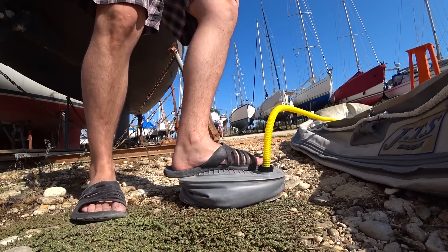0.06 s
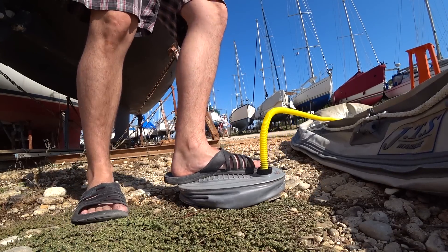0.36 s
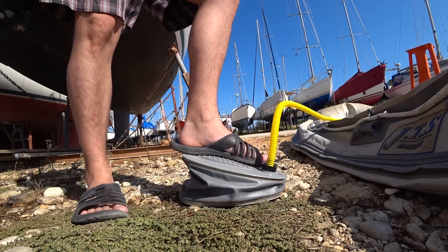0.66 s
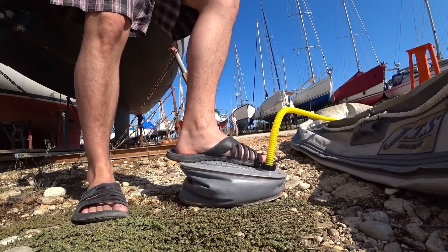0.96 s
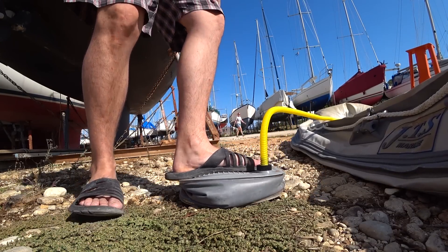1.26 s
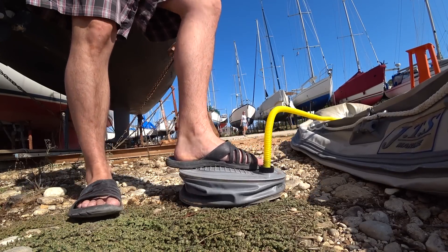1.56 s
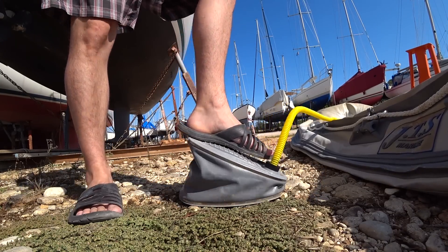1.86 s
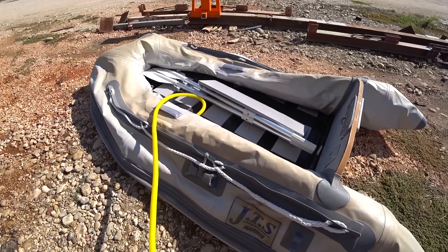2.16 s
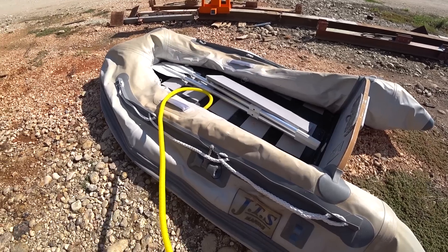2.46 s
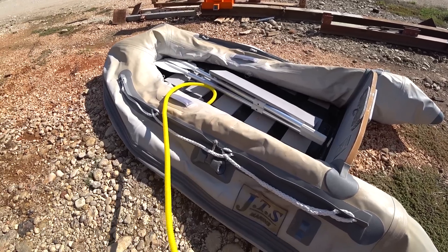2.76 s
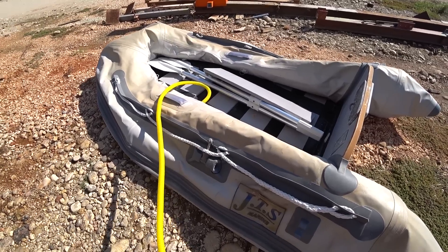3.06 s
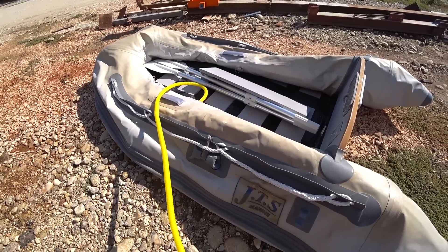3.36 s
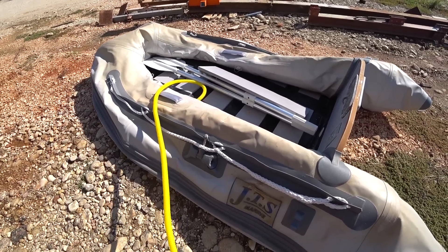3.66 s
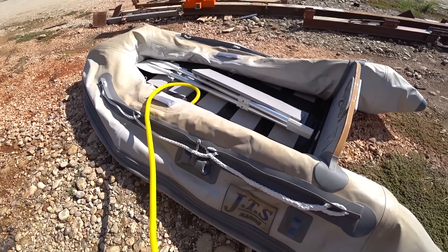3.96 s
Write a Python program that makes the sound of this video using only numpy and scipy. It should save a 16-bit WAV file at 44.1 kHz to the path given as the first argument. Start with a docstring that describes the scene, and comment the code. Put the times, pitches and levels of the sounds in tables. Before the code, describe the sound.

Air hisses in repeated pushes from a fabric foot bellows inflating a dinghy outdoors. A high valve whistle rides the strokes, alternating with faintly hooting intakes, soft thuds and snaps. Halfway, the microphone jumps from pump to boat.

```python
"""A hiss of air with a thin whistle on top: a fabric foot bellows pumps up a rubber dinghy on gravel.
Five pushes rush through the hose, and four of them make a valve whistle. Between them the bellows
gulps air through its inlet with a faint hoot; its coated cloth pops, crumples, thuds and rubs.
It is heard beside the pump at first, then abruptly from above the boat."""
import sys
import numpy as np
from scipy import signal
from scipy.fft import rfft, irfft, next_fast_len
from scipy.io import wavfile
from scipy.ndimage import uniform_filter1d, map_coordinates

SR = 44100
rng = np.random.default_rng(int(sys.argv[2]) if len(sys.argv) > 2 else 0)


def generate_wav(signal):
    """Clip the signal to [-1, 1] and save it as 16-bit WAV at the path in sys.argv[1]."""
    frames = np.transpose(np.atleast_2d(signal))
    scaled = np.clip(frames, -1, 1) * 32767
    pcm = np.round(scaled).astype(np.int16)
    wavfile.write(sys.argv[1], SR, pcm)


N = 176400


# Foot pushes: start_s, full_flow_s, ease_s, end_s, level_db
PUSHES_PUMP = [(-.1, .04, 0.21, 0.64, -31), (.915, 1.09, 1.285, 1.55, -30.5), (1.925, 2.1, 2.2, 2.4, -32)]
PUSHES_BOAT = [(1.85, 1.96, 2.185, 2.384, -29), (2.71, 2.88, 3.05, 3.307, -29),
               (3.63, 3.79, 3.95, 4.1, -29.5)]
# Hiss spectrum: freq_hz, gain_db
HISS_PUMP = [(100, -31.5), (400, -12), (760, -1), (4000, -1), (8500, -11), (11000, -12)]
HISS_BOAT = [(100, -36), (350, -19.5), (700, -4.5), (1400, -7), (3600, 0.5), (8000, -3.5), (11000, -11)]
# Hose resonance: centre_hz, width_hz, gain_db
HOSE_MODES_PUMP = [(1890, 47, 3.5)]
HOSE_MODES_BOAT = [(1870, 300, -0.76)]

def hose_hiss(pushes, spectrum, modes, rise_db=23.5, sag_db_per_s=27, release_s=0.054, flutter_db=0.86):
    """Air forced through the hose swells, holds and sags; more flow is brighter."""
    body, treble = turbulence(spectrum, modes)
    out, t = np.zeros(N), clock()
    for start, full, ease, end, db in pushes:
        rise = np.clip((full - t) / (full - start), 0, 2)
        flow_db = -rise_db * rise ** 2 - sag_db_per_s * np.maximum(t - ease, 0)
        valve = (t > start) * np.clip((end - t) / release_s, 0, 1)
        out += valve * amp(db + flow_db) * (body + treble * amp(0.58 * flow_db))
    return out * amp(flutter_db * wobble(60))


# Refills: start_s, full_flow_s, ease_s, end_s, level_db
GULPS_PUMP = [(.55, .735, 0.767, 0.864, -24.5), (1.535, 1.67, 1.749, 1.8855, -25.5)]
GULPS_BOAT = [(2.34, 2.51, 2.541, 2.698, -22), (3.283, 3.318, 3.416, 3.588, -21)]
# Inlet spectrum: freq_hz, gain_db
INLET_PUMP = [(100, -35), (270, -9.5), (680, -8), (860, 3), (2000, -1.5), (4100, -3), (6800, -6),
              (8800, -22), (10800, -18)]
INLET_BOAT = [(100, -39), (240, -13), (650, -18.5), (870, -4), (2200, -0.5), (2800, -10.5), (3500, -5),
              (4500, -16), (7000, -14), (9000, -22)]
# Inlet resonance: centre_hz, width_hz, gain_db
INLET_MODES_PUMP = [(4040, 160, -5.5)]
INLET_MODES_BOAT = [(1350, 103, 2.6)]

def inlet_gulps(gulps, spectrum, modes, swell_db=29.5, flutter_db=1):
    """Air drawn past the fluttering inlet flap, one arch per refill."""
    body, treble = turbulence(spectrum, modes)
    out, t = np.zeros(N), clock()
    for start, full, ease, end, db in gulps:
        off_peak = np.maximum((full - t) / (full - start), (t - ease) / (end - ease))
        flow_db = -swell_db * np.clip(off_peak, 0, 2) ** 2
        out += amp(db + flow_db) * (body + treble * amp(0.069 * flow_db))
    return out * amp(flutter_db * wobble(150))


# Valve tone, one track per whistle: time_s, pitch_hz, level_db, octave_level_db
WHISTLES = [
    [(0, 4540, -35, -47), (.07, 5080, -29, -30), (.154, 5306, -26.5, -25), (.238, 4940, -30.5, -35.5),
     (.29, 4590, -37, -48)],
    [(1.015, 4850, -38, -58), (1.055, 4669, -33.5, -44), (1.118, 5250, -27.5, -27),
     (1.18, 5460, -35, -28.5), (1.222, 5160, -27.5, -25.5), (1.255, 4900, -26, -34),
     (1.296, 4800, -28.5, -43)],
    [(2.825, 4750, -37, -42), (2.96, 4970, -40, -50), (3.045, 4970, -29.5, -34), (3.075, 4880, -29, -29),
     (3.104, 4460, -27.5, -31), (3.12, 4330, -38, -43)],
    [(3.727, 4690, -31.5, -63), (3.77, 4910, -35, -47), (3.83, 4960, -44, -56), (3.91, 4780, -30, -44),
     (3.955, 4886, -24.5, -38), (3.98, 4750, -24, -32), (4, 4550, -29, -27.5)],
]

def valve_whistles(trim_db=-1.5, flutter_db=2, rattle_at_s=1.268, rattle_half_s=0.0321):
    """The valve sings an unsteady gliding tone and its octave; the pitch rattles once, briefly."""
    drift = 1 + 0.00305 * wobble(90) + 0.00705 * wobble(1200)
    rattle = np.exp(-((clock() - rattle_at_s) / rattle_half_s) ** 4)
    drift += 0.028 * rattle * wobble(700)
    tone_flutter, octave_flutter = amp(flutter_db * wobble(110)), amp(flutter_db * wobble(110))
    out = np.zeros(N)
    for track in WHISTLES:
        gate, hz, db, octave_db = curves(track, fade_s=.004)
        phase = 2 * np.pi * np.cumsum(hz * drift) / SR
        tone = tone_flutter * amp(db) * np.sin(phase)
        octave = octave_flutter * amp(octave_db) * np.sin(2 * phase)
        out += gate * (tone + octave)
    return np.sqrt(2) * amp(trim_db) * out


# Inlet noise bands, one track per band: time_s, pitch_hz, level_db
HOOTS = [
    [(1.6, 2429, -45), (1.652, 2500, -31), (1.69, 3050, -35)],
    [(2.46, 1661, -37), (2.53, 1858, -27), (2.62, 2024, -35)],
    [(3.31, 3770, -32), (3.36, 3590, -30.5), (3.44, 3094, -38)],
    [(3.31, 2750, -30.5), (3.345, 2610, -27), (3.42, 2300, -39)],
]

def inlet_hoots(width_hz=170):
    """Narrow bands of turbulence glide at the inlet as the bellows opens."""
    out = np.zeros(N)
    for track in HOOTS:
        gate, hz, db = curves(track)
        band = wobble(width_hz) + 1j * wobble(width_hz)
        carrier = np.exp(2j * np.pi * np.cumsum(hz) / SR)
        out += gate * amp(db) * unit(np.real(band * carrier))
    return out


# Snaps: start_s, level_db, cutoff_hz, t60_s
POPS = [(0.9428, -23.5, 6840, 0.0032), (1.412, -24, 2100, 0.028), (2.7384, -32, 3180, 0.027),
        (3.568, -27.5, 1490, 0.021), (3.623, -26.5, 1790, 0.015), (3.6863, -17.5, 1870, 0.044),
        (3.69, -14, 1370, 0.021), (3.691, -13.5, 760, 0.031)]
# Cloth resonances: centre_hz, width_hz, gain_db
CLOTH_MODES = [(367, 117, 4.5), (724, 114, 2), (1150, 170, 2), (1414, 180, 4)]

def cloth_pops(broadband_db=-4, tail_db=-27, tail_t60_s=0.18):
    """Cloth and inlet flap snap taut and ring the cloth's resonances; tight snaps have little bass."""
    out = np.zeros(N)
    for start, db, cutoff_hz, t60 in POPS:
        def skin(f):
            lowpass = 1 / np.sqrt(1 + (f / cutoff_hz) ** 4)
            highpass = f ** 2 / (f ** 2 + (0.3 * cutoff_hz) ** 2)
            return (amp(broadband_db) + ring(CLOTH_MODES, f)) * lowpass * highpass
        envelope = burst(start, t60) + amp(tail_db) * burst(start, tail_t60_s)
        snap = filtered(rng.standard_normal(N), skin) * envelope
        out += amp(db) * snap * np.linalg.norm(envelope) / np.linalg.norm(snap)
    return out


# Slack folds flipping over: start_s, level_db
FOLD_THUDS = [(.82, -29), (1.887, -32.5), (2.515, -28), (2.694, -28.5), (3.481, -25.5)]
# Hollow knocks under the foot: start_s, level_db
FOOT_KNOCKS = [(.9615, -13), (2.7236, -14.5)]

def bellows_thuds(hits, pitch_hz, t60_s, attack_s=0.00083, rough_rad=0.57):
    """A rough damped tone as a fold flips over or the bellows takes the foot's weight."""
    out = np.zeros(N)
    for start, db in hits:
        t = np.maximum(clock() - start, 0)
        envelope = burst(start, t60_s) * (1 - np.exp(-t / attack_s))
        out += amp(db) * envelope * np.sin(2 * np.pi * pitch_hz * t + rough_rad * wobble(300))
    return out


# Crumpling folds: centre_s, half_length_s, level_db, centre_hz
CRUMPLES = [(0.791, .05, -36, 727), (1.749, .12, -39, 602), (2.259, .17, -36.5, 972),
            (2.688, .04, -37, 850), (3.18, .08, -35.5, 900.1)]

def cloth_crumples(creases_per_s=750, t60_cycles=28, size_spread_db=3.5):
    """Swarms of tiny damped creases as the cloth folds."""
    out, t = np.zeros(N), np.arange(SR // 50) / SR
    for centre_s, half_s, db, centre_hz in CRUMPLES:
        count = int(creases_per_s * 2 * half_s)
        when, pitch, size = np.hsplit(rng.standard_normal((400, 3))[:count], 3)
        start_s = centre_s + half_s * np.tanh(when / 2)
        hz = np.clip(centre_hz * np.exp(0.474 * pitch), 150, 9000)
        decay = amp(-60 * t * hz / t60_cycles)
        creases = amp(size_spread_db * size) * np.sqrt(hz) * np.sin(2 * np.pi * hz * t) * decay
        samples = (start_s * SR).astype(int) + np.arange(len(t))
        swarm = np.bincount(samples.ravel(), creases.ravel(), N)[:N]
        out += amp(db) * swarm * np.sqrt(half_s * SR) / np.linalg.norm(swarm)
    return out


# Rub under the sole, creak as the foot lifts: centre_s, length_s, level_db
RUBS = [(1.485, 0.061, -27)]
CREAKS = [(.557, 0.056, -31)]
# Bellows resonances: centre_hz, width_hz, gain_db
RUB_MODES = [(457, 76, 1), (860, 240, 5.5), (1245, 120, 10.5), (3200, 700, -6.5)]
CREAK_MODES = [(494, 54, 5.5), (1144, 70, 6.5), (1497, 47, 5), (3110, 70, 4)]

def cloth_friction(strokes, modes, slips_per_s=2600):
    """Irregular slips of cloth on cloth ring the flattened bellows."""
    slips = (rng.random(N) < slips_per_s / SR) * (1 + .5 * rng.standard_normal(N))
    rasp = unit(filtered(slips, lambda f: ring(modes, f)))
    envelope = sum(amp(db) / (1 + (2 * (clock() - at) / length) ** 8) for at, length, db in strokes)
    return rasp * envelope


# Outdoor air spectrum: freq_hz, gain_db
AIR_SPECTRUM = [(25, -20), (800, 4.5), (3000, -17.5)]

def outdoor_air(level_db=-53.5):
    """Faint steady outdoor noise."""
    return amp(level_db) * unit(filtered(rng.standard_normal(N), lambda f: amp(along(AIR_SPECTRUM, f))))


def ground_scatter(x, level_db=-13.5, t60_s=.07):
    """Short diffuse stereo reflections from ground and hulls."""
    tail = (rng.standard_normal((2, N)) * burst(0, t60_s))[:, :SR // 2]
    tail /= np.linalg.norm(tail[0])
    return amp(level_db) * signal.fftconvolve(x[None], tail, axes=1)[:, :N]


def turbulence(spectrum, modes, ripple_db=2.6, split_hz=3730):
    """Duct noise with main resonances and fine ones that drift as it flexes; returns body, treble."""
    frames = signal.stft(rng.standard_normal(N), nperseg=1024)[2]
    ripple = uniform_filter1d(rng.standard_normal(frames.shape), 3, axis=0)
    ripple = unit(uniform_filter1d(ripple, 16, axis=1))
    noise = signal.istft(frames * amp(ripple_db * ripple), nperseg=1024)[1][:N]
    rush = unit(filtered(noise, lambda f: amp(along(spectrum, f)) * (1 + ring(modes, f))))
    body = filtered(rush, lambda f: 1 / (1 + (f / split_hz) ** 8))
    return body, rush - body


def amp(db):
    """Decibels to gain."""
    return 10 ** (np.asarray(db) / 20)


def unit(x):
    """Scale to rms 1."""
    return x / np.sqrt(np.mean(x ** 2) + 1e-20)


def clock():
    """Sample times in seconds."""
    return np.arange(N) / SR


def along(points, hz):
    """Interpolate (freq_hz, value) points on a log axis."""
    freqs, values = np.transpose(points)
    return np.interp(np.log(hz + 1), np.log(freqs + 1), values)


def curves(track, fade_s=0.0025):
    """A gate over the track's span, then each column per sample."""
    times, *columns = np.transpose(track)
    t = clock()
    gate = np.clip(np.minimum(t - times[0], times[-1] - t) / fade_s + 2, 0, 2) / 2
    return [gate] + [np.interp(t, times, column) for column in columns]


def wobble(knots_per_s):
    """A smooth random curve."""
    knots = rng.standard_normal(int(N * knots_per_s / SR) + 4)
    return map_coordinates(knots, [clock() * knots_per_s])


def burst(start_s, t60_s):
    """Sudden start, exponential decay."""
    t = clock() - start_s
    return (t >= 0) * amp(-60 * np.abs(t) / t60_s)


def filtered(x, response):
    """Apply a complex frequency response."""
    size = next_fast_len(N + SR // 2)
    return irfft(rfft(x, size) * response(np.fft.rfftfreq(size, 1 / SR)), size)[..., :N]


def ring(modes, f):
    """Summed response of band-pass resonances."""
    return sum(amp(db) * 1j * f * width / (hz * hz - f * f + 1j * f * width) for hz, width, db in modes)


# Phase, left ahead of right: freq_hz, lead_rad
LEAD_PUMP = [(0, -1.8), (1210, 1.32), (7240, 0.053), (11600, -1.1)]
LEAD_BOAT = [(0, 0), (1210, 1.0), (7060, 0.53), (11600, 0.82)]
# Balance: freq_hz, left_minus_right_db
PAN_PUMP = [(350, -0.5), (11000, -2.8)]
PAN_BOAT = [(200, -1.3), (1000, 1.2)]

def stereo(x, lead, pan):
    """Phase and level differences between left and right."""
    def response(f):
        log_ratio = 1j * along(lead, f) + np.log(amp(along(pan, f)))
        return np.exp(np.outer([.5, -.5], log_ratio))
    return filtered(x, response)


def scene(move_s=1.963, cloth_low_hz=163):
    """The pumping heard beside the pump, then from above the boat after move_s."""
    thuds = bellows_thuds(FOLD_THUDS, pitch_hz=239, t60_s=0.072)
    thuds += bellows_thuds(FOOT_KNOCKS, pitch_hz=567, t60_s=0.016)
    friction = cloth_friction(RUBS, RUB_MODES) + cloth_friction(CREAKS, CREAK_MODES)
    low_cut = signal.butter(3, cloth_low_hz, "high", fs=SR, output="sos")
    cloth = signal.sosfilt(low_cut, cloth_pops() + cloth_crumples() + thuds + friction)
    common = valve_whistles() + inlet_hoots() + cloth + outdoor_air()
    pump = common + hose_hiss(PUSHES_PUMP, HISS_PUMP, HOSE_MODES_PUMP)
    pump += inlet_gulps(GULPS_PUMP, INLET_PUMP, INLET_MODES_PUMP)
    boat = common + hose_hiss(PUSHES_BOAT, HISS_BOAT, HOSE_MODES_BOAT)
    boat += inlet_gulps(GULPS_BOAT, INLET_BOAT, INLET_MODES_BOAT)
    pump *= clock() < move_s
    boat *= clock() >= move_s
    direct = stereo(pump, LEAD_PUMP, PAN_PUMP) + stereo(boat, LEAD_BOAT, PAN_BOAT)
    return direct + ground_scatter(pump + boat)


def record(dry, top_hz=11200, edge_hz=200):
    """Steep low-pass at the band limit."""
    return filtered(dry, lambda f: np.clip((top_hz - f) / edge_hz + .5, 0, 1))


dry = scene()
out = record(dry)
generate_wav(out)
```